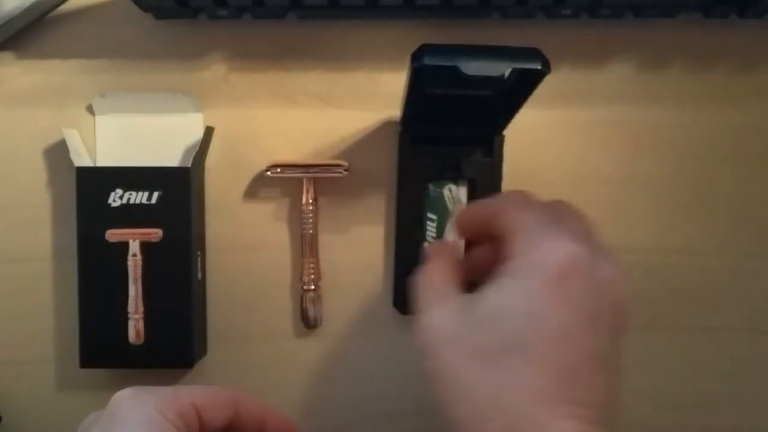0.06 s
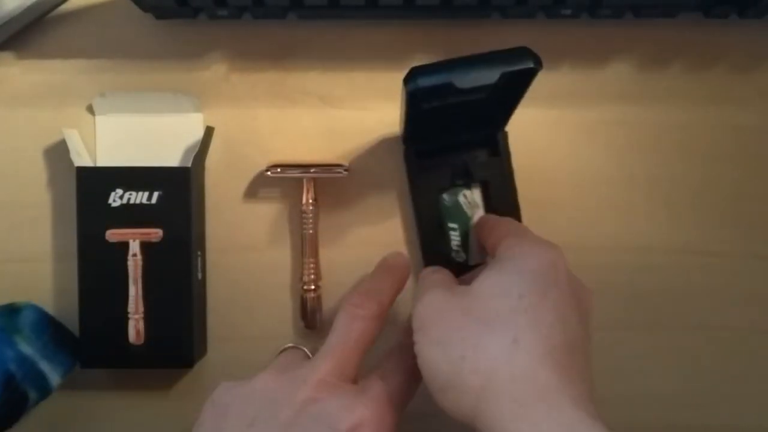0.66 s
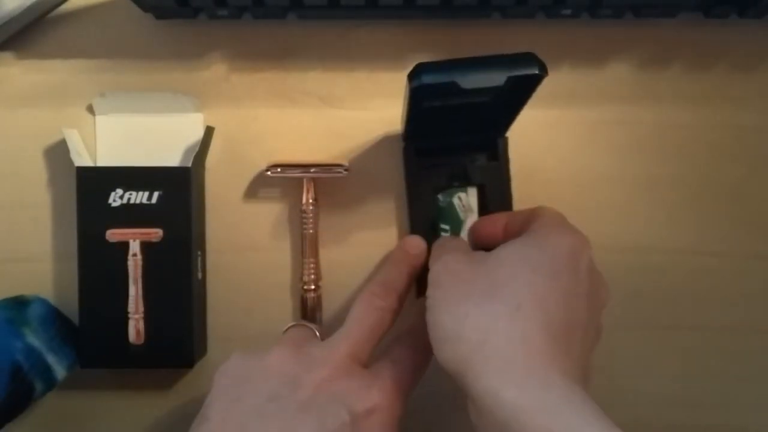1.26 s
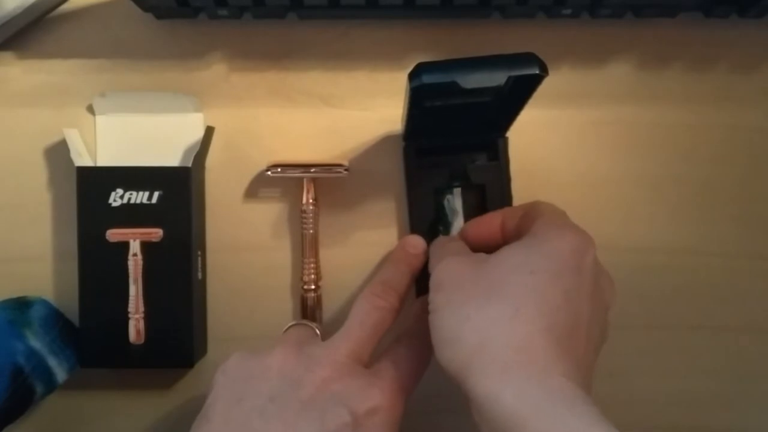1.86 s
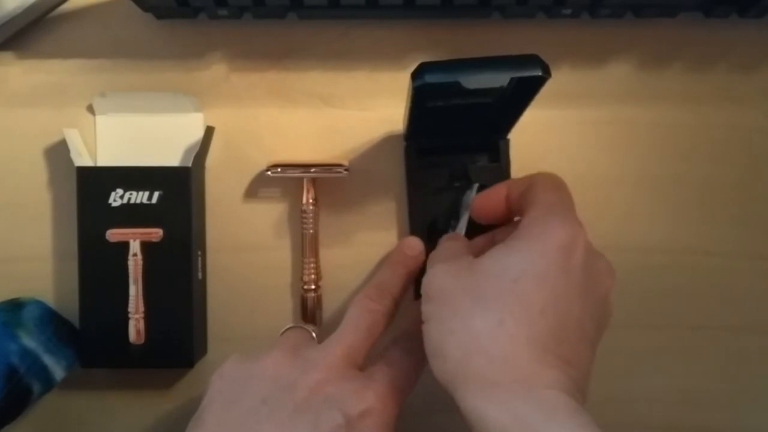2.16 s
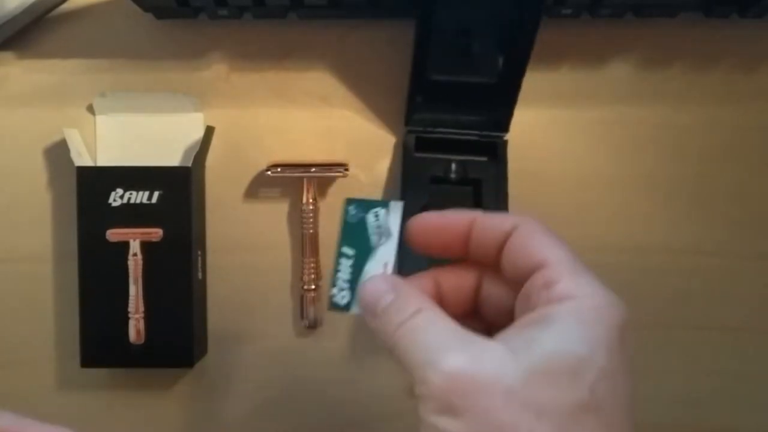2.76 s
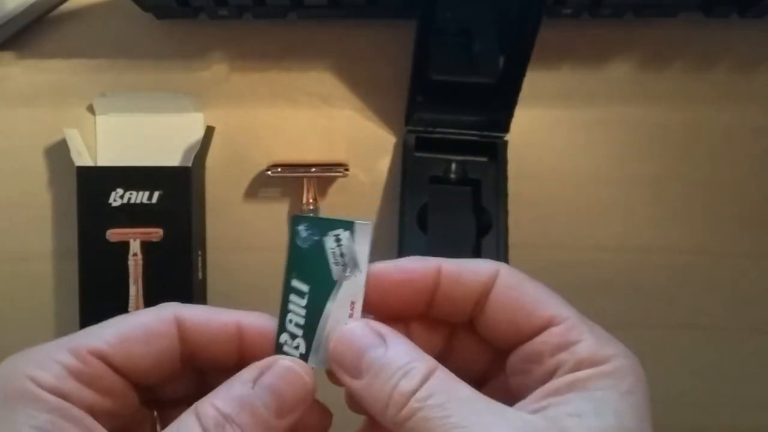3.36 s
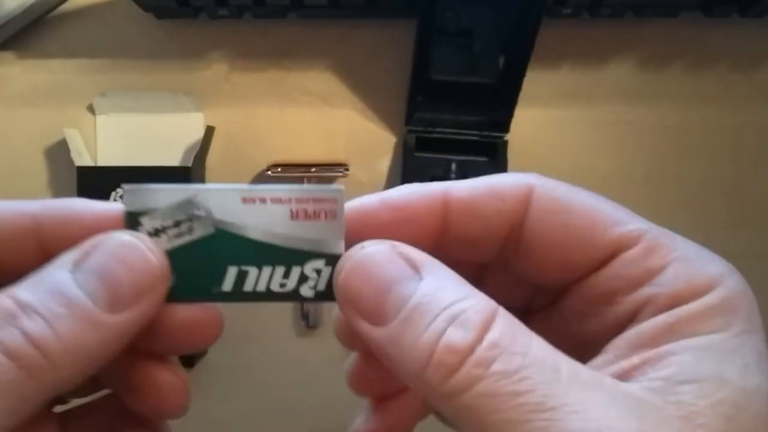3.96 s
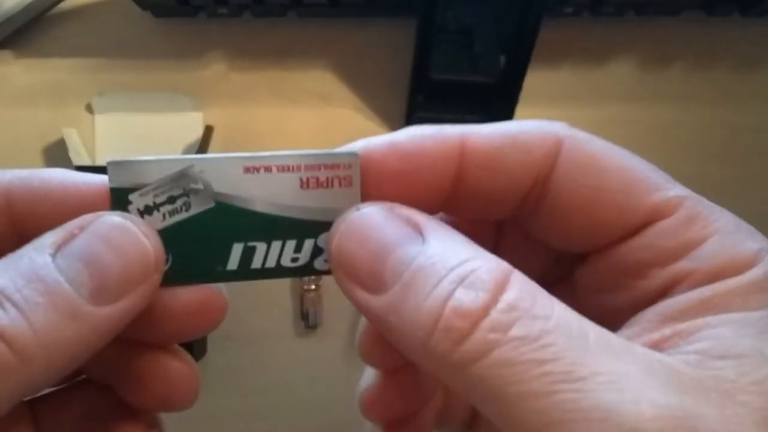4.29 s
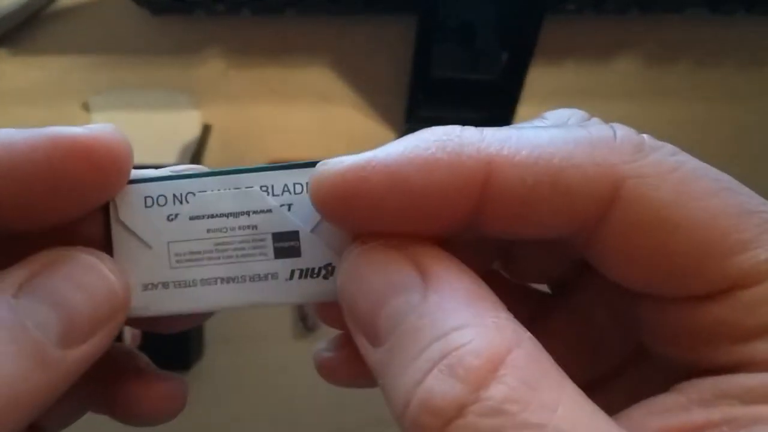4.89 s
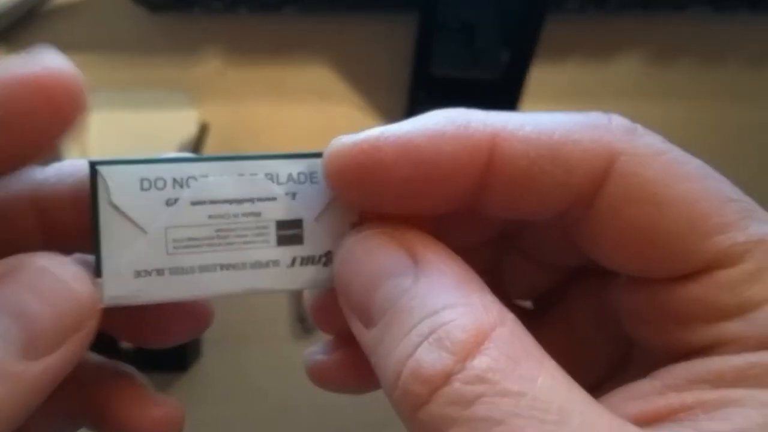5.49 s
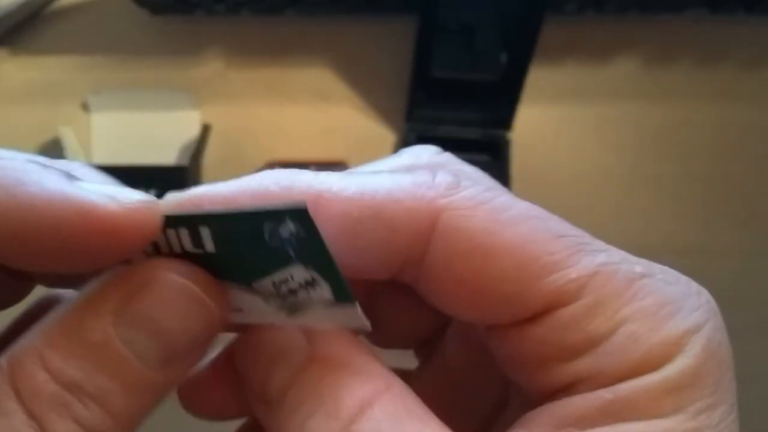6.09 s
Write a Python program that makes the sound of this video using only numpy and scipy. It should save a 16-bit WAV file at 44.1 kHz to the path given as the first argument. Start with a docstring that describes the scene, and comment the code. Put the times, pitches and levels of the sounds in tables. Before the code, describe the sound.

In a quiet room with a low hum, a hard plastic razor case scuffs briefly across a wooden desk. A paper pack of blades is pried from its tray with a sharp snap, small scrapes and a faint squeak while the case knocks lightly. The lid falls open with a loud, ringing clack and bounces. Then fingers turn the pack over, with soft rubbing and small crinkling ticks heard up close.

```python
"""A quiet room hums, fingers brush paper, and a hard plastic razor case slides, knocks and groans on
a wooden desk as it sticks and slips. A paper pack of razor blades is pried out of the case: it
scrapes, squeaks and snaps against its tray. The lid falls open with a ringing clack and bounces.
Then the pack is turned over between the fingers: soft rubbing and small crinkling ticks."""
import sys
import numpy as np
from scipy import signal
from scipy.fft import rfft, irfft
from scipy.io import wavfile

SR = 44100
rng = np.random.default_rng(int(sys.argv[2]) if len(sys.argv) > 2 else 0)


def generate_wav(signal):
    """Clip the signal to [-1, 1] and save it as 16-bit WAV at the path in sys.argv[1]."""
    frames = np.transpose(np.atleast_2d(signal))
    scaled = np.clip(frames, -1, 1) * 32767
    pcm = np.round(scaled).astype(np.int16)
    wavfile.write(sys.argv[1], SR, pcm)


N = 270774
TIME = np.arange(N) / SR

# Levels compare the rows of a table; the functions set how loud each sound ends up.
# tone colour of the room's rumble and hiss: f/Hz, level/dB
ROOM_COLOUR = [(12, -41.5), (26, -2), (45, 1.5), (68, -12), (100, -10.5), (180, -11), (380, -16),
               (650, -18), (2200, -20), (3200, -21), (4500, -24.5), (6300, -25.5), (7800, -19),
               (9800, -19.5), (12000, -26), (16000, -27)]
# the deep hum swells: t/s of the top, level/dB, build-up/s
HUM_SWELLS = [(0.21, -53, 0.12), (0.65, -56.5, 0.61), (4.95, -53.5, 0.81)]
# faint steady tones of the room: f/Hz, width/Hz, level/dB
ROOM_TONES = [(94.1, 12, -74), (227, 8.5, -83), (383, 13, -84), (2970, 50, -84)]
# how long the room echoes: f/Hz, time to fade by 60 dB/s
ROOM_FADE = [(200, 0.72), (1000, 0.31), (4000, 0.22), (14000, 0.097)]
# how alike left and right are: f/Hz, likeness (1 = the same)
LIKENESS = [(60, 1), (130, 0.34), (380, 0.43), (700, 0.15), (1400, 0.0077), (15000, 0.012)]

# a finger slides over the paper: t/s of firmest press, level/dB, build-up/s, extra for the edge/dB
RUBS = [(0.45, -62, 1, 0.5), (0.905, -62.5, 0.13, 5.5), (1.94, -58, 0.16, 3.5), (2.18, -64.5, 0.21, 5),
        (2.44, -62, 0.32, -2), (3.07, -62, 0.81, 0.5), (3.481, -49, 0.1, -18), (3.61, -55.5, 0.062, -3),
        (3.685, -56.5, 0.083, 1), (3.77, -52, 0.033, -12), (3.825, -56, 0.073, -5), (3.934, -56, 0.073, -6),
        (4.065, -58.5, 0.15, 0.5), (4.21, -62, 0.15, -14), (4.335, -53.5, 0.063, -10),
        (4.39, -49.5, 0.061, -13), (4.409, -44.5, 0.011, 0), (4.57, -55, 0.091, -13),
        (4.632, -55, 0.016, -14), (4.69, -43, 0.036, -6.5), (4.795, -43.5, 0.026, -9),
        (5.48, -56, 0.057, -7), (5.737, -50, 0.18, -26), (5.88, -40, 0.028, -16), (5.907, -45.5, 0.036, -5),
        (6.057, -50, 0.12, -12), (6.132, -54, 0.022, -21)]
# hiss of skin on paper: f/Hz, level/dB
PAPER_COLOUR = [(600, -47), (2000, -18.5), (4200, -19.5), (5600, -12), (6800, -7.5), (8500, -0.5),
                (10300, -6), (11800, -10), (16000, -13)]
# rasp of the paper's cut edge on skin: f/Hz, level/dB
EDGE_COLOUR = [(600, -27.5), (1500, -18.5), (2300, -6.5), (3300, -9), (4200, -1.5), (5600, -9.5),
               (8000, -0.5), (10500, -4), (14000, -8.5), (16000, -4.5)]
# the wrapper crinkles: t/s, level/dB, extra for the edge/dB
CRINKLES = [(3.6606, -45, -4), (3.831, -41, -6), (3.9852, -40.5, 6), (4.4098, -32, -3), (4.6784, -42, -3),
            (4.6922, -34, -11), (4.7015, -35.5, -2), (4.7832, -33.5, -7), (4.7935, -31.5, -11),
            (4.8023, -29.5, -9), (4.8113, -31, -7), (5.8795, -30, -9), (5.8946, -30, -6), (5.904, -25, -5)]
# tick of a paper fold: f/Hz, level/dB
CRINKLE_COLOUR = [(400, -24), (800, -7), (2000, -20.5), (4200, -20), (5900, -23), (7300, -0.5), (8400, 15),
                  (10300, 7.5), (11500, -32), (16000, -48)]

# the case is pushed over the desk: t/s of firmest push, level/dB, build-up/s
PUSHES = [(0.464, -51, 0.025), (0.51, -56, 0.078), (0.552, -51.5, 0.062), (0.6, -43.5, 0.05),
          (0.621, -42, 0.037), (0.806, -57.5, 0.04), (0.862, -58.5, 0.075), (0.911, -55.5, 0.051),
          (2.005, -64, 0.26)]
# rasp of plastic on wood: f/Hz, level/dB
DRAG_COLOUR = [(200, -28), (335, 2.5), (480, -14), (760, -1), (1000, -8.5), (1350, -1.5), (2300, -6),
               (2900, -14.5), (6000, -16.5), (9000, -12.5), (12000, -18), (15500, -36)]
# modes (natural notes; wider ones fade sooner) of the dragged case: f/Hz, width/Hz, level/dB
DRAG_MODES = [(334, 36, 4), (748, 50, 7), (1000, 120, -3), (1290, 70, -1), (1560, 45, -2), (1840, 35, -3),
              (2080, 89, -6), (2420, 55, -9)]
# the case rocks on the desk, and at 2.660 s the bouncing lid knocks it down: t/s, thud level/dB, rap level/dB,
# thud f/Hz
KNOCKS = [(0.457, -56, -39, 350), (1.700, -51, -53, 340), (1.732, -50, -58, 335), (1.753, -51, -52, 355),
          (2.062, -44, -42, 366), (2.140, -43, -41, 355), (2.547, -49, -54, 318), (2.660, -44, -46, 365),
          (5.903, -60, -55, 370)]
# notes of the desk top under the case: ratio to the thud's pitch, width/Hz, level/dB
DESK_MODES = [(0.89, 44, -1), (1.02, 55, 0), (1.09, 15, 5.5)]
# rap of the case on the desk: f/Hz, level/dB
RAP_COLOUR = [(250, -34.5), (500, -15), (800, -17), (1150, -0.5), (1500, -21), (2100, -8.5), (3200, -21),
              (6000, -19), (12000, -42)]
# notes of the case's hollow shell: f/Hz, width/Hz, level/dB
SHELL_MODES = [(619, 40, -3), (780, 50, -5), (1080, 70, -6), (1305, 60, 0), (1510, 150, 1), (2100, 70, -6),
               (2390, 60, -7)]

# the pack catches on the tray and snaps free: t/s, level/dB, scatter/s, top of the treble/Hz
SNAPS = [(0.457, -31.5, 0.004, 10000), (0.858, -41, 0.005, 9000), (0.912, -39.5, 0.004, 9000),
         (1.1335, -37.5, 0.0008, 8000), (1.2085, -28, 0.005, 18000), (1.2108, -14, 0.0011, 20000),
         (1.2137, -19, .004, 20000), (1.2166, -18.5, 0.005, 20000), (1.2215, -22, .019, 20000),
         (1.5262, -38, 0.003, 16000), (1.5690, -25, 0.004, 18000), (1.9604, -23.5, 0.0019, 7800)]
# flick of the pack's edge: f/Hz, level/dB
SNAP_COLOUR = [(300, -33), (900, -24), (2000, -18), (3100, -11), (3600, -16), (4400, -11.5), (5200, -5.5),
               (6100, -10), (7250, -2), (7900, -6), (8800, -3.5), (10400, -1), (11300, -4), (13000, -7),
               (16000, -6.5)]
# brief ping of the tray wall: f/Hz, width/Hz, level/dB
TRAY_MODES = [(5300, 420, 0), (7200, 400, -6)]
# the case groans at the hardest push: t/s of the top, level/dB, build-up/s, fade/s, f/Hz
GROANS = [(0.621, -46, 0.055, 0.014, 750), (0.624, -49.5, 0.035, 0.03, 332)]
# the pack scrapes along the tray: t/s of firmest press, level/dB, build-up/s
SCRAPES = [(1.175, -65, 0.11), (1.541, -53, 0.019), (1.560, -49.5, 0.026), (1.572, -41.5, 0.009),
           (2.015, -56.5, 0.1)]
# rasp of card on plastic: f/Hz, level/dB
SCRAPE_COLOUR = [(250, -15), (500, -6), (780, 0.5), (1100, -4), (1800, -7), (2400, 0.5), (3200, -10.5),
                 (4250, -2), (5500, -3.5), (8000, -1.5), (11000, -2.5), (16000, -12)]
# the squeezed pack squeaks: t/s of firmest press, level/dB, build-up/s
SQUEAKS = [(1.856, -45, 0.062), (4.70, -61, 0.063)]
# notes of the squeak: f/Hz, width/Hz, level/dB
SQUEAK_MODES = [(1450, 130, -6), (1720, 60, 4), (2130, 70, 4), (2750, 400, -11), (4170, 350, -8),
                (5100, 400, -12), (5850, 200, -9), (7620, 200, -1), (9800, 5000, -13)]

# the lid falls open and rattles: t/s, level/dB, scatter/s
CLACKS = [(2.6162, -28.5, 0.0073), (2.6193, -9, 0.0013), (2.6208, -8.5, 0.01), (2.6265, -15.5, 0.032),
          (2.6375, -28, .004), (2.6573, -22, 0.003), (2.6603, -20.5, .004), (2.6945, -24, 0.0089),
          (2.7212, -28.5, 0.0078)]
# crack of plastic on plastic: f/Hz, level/dB
CRACK_COLOUR = [(150, -32), (400, -13), (800, -13.5), (1250, -10), (1600, -8), (2050, -3), (2350, -9),
                (2700, -3), (3150, -11.5), (3700, -5.5), (4300, -6), (5000, -3), (6500, -4.5), (8200, 1),
                (10200, -0.5), (11800, -9.5), (16000, -15)]
# ringing of the plastic case: f/Hz, width/Hz, level/dB
CASE_MODES = [(1980, 200, -7), (2660, 170, -1), (3830, 160, 0), (4100, 70, -6), (4580, 150, -2),
              (4900, 120, -2), (5620, 70, -1), (5960, 43, -4), (6240, 51, -1), (6820, 90, -5),
              (7450, 70, 3), (7735, 34, 1), (7960, 45, 3), (8230, 40, 6), (8570, 30, 1), (8880, 39, 1),
              (9230, 30, 2), (9480, 36, 1), (9910, 25, 0), (10300, 45, -1)]
# the clack shakes the whole desk: f/Hz, width/Hz, level/dB
BOOM_MODES = [(48, 15, -10), (87, 7, -3), (259, 14, -1), (382, 15, -3)]


def from_db(db):
    """Turn decibels into a number to multiply by."""
    return 10 ** (np.asarray(db) / 20)


def rms_one(x):
    """Scale to an average power of 1."""
    return x / np.sqrt(np.mean(x ** 2) + 1e-20)


def energy_one(x):
    """Scale each channel so that its squares add up to 1."""
    return x / np.sqrt(np.sum(x ** 2, axis=-1, keepdims=True) + 1e-20)


def at_hz(points, hz):
    """Read between the rows of a table, with octaves evenly spaced."""
    knots, values = np.transpose(points)
    return np.interp(np.log(np.maximum(hz, 1)), np.log(knots), values)


def through(x, response):
    """Pass a sound through a thing, given that thing's response to one click."""
    return signal.fftconvolve(np.atleast_2d(x), np.atleast_2d(response), axes=-1)[:, :N]


def colour(spectrum, size=8192):
    """The tightest (minimum-phase) click that has the given tone colour."""
    gains = from_db(at_hz(spectrum, np.fft.rfftfreq(size, 1 / SR)))
    cepstrum = irfft(np.log(gains))
    return energy_one(irfft(np.exp(rfft(2 * cepstrum[:size // 2], size))))


def ringing(modes, size=16384):
    """A tapped body rings with one fading sine wave for each mode."""
    t, out = TIME[:size], 0
    for k, (hz, width, db) in enumerate(modes):
        fade = from_db(db) * width * np.exp(-np.pi * width * t)
        out = out + (-1) ** k * fade * np.sin(2 * np.pi * hz * t)
    return energy_one(out)


def filtered(x, kind, hz):
    """Keep the "low", "high" or "band" part of a sound."""
    return signal.sosfilt(signal.butter(2, hz, kind, fs=SR, output="sos"), x)


def shaded(x, shade_hz=12500):
    """The highest treble is weaker on the right."""
    return np.array([x[0], filtered(x[1], "low", shade_hz)])


def stereo_noise(size):
    """White noise whose left and right are alike in the bass and unrelated in the treble."""
    alike = np.clip(at_hz(LIKENESS, np.fft.rfftfreq(size, 1 / SR)), -1, 1)
    mid, side = rfft(rng.standard_normal((2, size)))
    return irfft(np.sqrt(1 + alike) * mid + np.sqrt(1 - alike) * side * [[1], [-1]], size)


def room_tail(size=20000):
    """A wash of room echoes that builds up quickly and dies sooner in the treble."""
    t, noise, out = TIME[:size], stereo_noise(size), 0
    edges_hz = np.geomspace(60, 19000, 9)
    for low, high in zip(edges_hz, edges_hz[1:]):
        fade_s = at_hz(ROOM_FADE, np.sqrt(low * high))
        out = out + filtered(noise, "band", [low, high]) * np.exp(-np.log(1000) * t / fade_s)
    return energy_one(out * (1 - np.exp(-t / 0.003)))


def desk_echoes(x, level_db, spread_s, count=24):
    """Add the quick treble echoes that come off the desk top and the things on it."""
    echoes = np.zeros((2, 2048))
    for side in echoes:
        lateness = rng.uniform(0, 1, count)
        at = np.clip(lateness * spread_s * SR + 20, 1, 2000).astype(int)
        side[at] = rng.choice([-1, 1], count) * np.exp(-lateness)
    response = from_db(level_db) * energy_one(filtered(echoes, "high", 3000))
    response[:, 0] += 1  # the direct sound
    return through(x, response)


def strokes(rows, bend, release_s, linger):
    """Loudness over time: each stroke builds up, then fades; `linger` makes slow ones fade later."""
    power = 0
    for s, db, build in rows:
        rise = np.clip(1 + (TIME - s) / build, 0, 1) ** bend
        fall = np.exp(-np.maximum(TIME - s, 0) / (release_s + linger * build))
        power = power + (from_db(db) * rise * fall) ** 2
    return np.sqrt(power)


def friction(pressure, per_s, spread_db, room_db, slip_s=0.00095):
    """Rubbing surfaces catch and slip at random; each slip is a tiny burst that echoes in the room."""
    sizes = from_db(spread_db * np.minimum(rng.exponential(1, N), 4))
    slips = sizes * (rng.random(N) < per_s / SR)
    burst_power = signal.lfilter([1], [1, -np.exp(-2 / (slip_s * SR))], slips ** 2 + 1e-18)
    direct = pressure * rms_one(np.sqrt(burst_power) * stereo_noise(N))
    return direct + from_db(room_db) * through(direct, room_tail())


def contacts(rows, scatter_db, room_db, size=20000):
    """Each contact is a sharp click, its quick scatter off things nearby, and the room's echo."""
    out, t, tail = np.zeros((2, N + size)), TIME[:size], room_tail(size)
    for s, db, scatter_s in rows:
        scatter = energy_one(stereo_noise(size) * np.exp(-t / scatter_s))
        blow = from_db(scatter_db) * scatter + from_db(room_db) * tail
        blow[:, 0] += 1  # the click
        at = round(s * SR)
        out[:, at:at + size] += from_db(db) * energy_one(blow)
    return out[:, :N]


def struck(rows, modes, vary_db, apart_hz, size=8192):
    """Every blow rings the modes with new strengths; high modes are less alike left and right."""
    out, t = np.zeros((2, N + size)), TIME[:size]
    hz, width, mode_db = np.transpose(modes)[:, :, None]
    for s, db, _ in rows:
        strength, start, apart = rng.standard_normal((3, len(modes), 1))
        fade = from_db(mode_db + vary_db * strength) * width * np.exp(-np.pi * width * t)
        phase = 2 * np.pi * (hz * t + start)
        shift = apart * hz / apart_hz
        ring = np.array([np.sum(fade * np.sin(phase + side * shift), axis=0) for side in (1, -1)])
        out[:, round(s * SR):][:, :size] += from_db(db) * energy_one(ring)
    return out[:, :N]


def quiet_room(hiss_db=-64.5, hum_db=-69, swell_db=-3, hum_hz=38, waver_hz=4):
    """Even rumble and hiss, a wavering deep hum that swells now and then, and a few faint tones."""
    hiss = from_db(hiss_db) * through(stereo_noise(N), colour(ROOM_COLOUR))
    knots = np.linspace(0, TIME[-1], 50)
    pitch = hum_hz + waver_hz * np.interp(TIME, knots, rng.standard_normal(len(knots)))
    swells = from_db(swell_db) * strokes(HUM_SWELLS, bend=2.1, release_s=0.032, linger=0.17)
    hum = np.hypot(from_db(hum_db), swells) * rms_one(np.sin(2 * np.pi * np.cumsum(pitch) / SR))
    air = stereo_noise(N)
    tones = sum(from_db(db) * through(air, ringing([(hz, width, 0)])) for hz, width, db in ROOM_TONES)
    return hiss + hum + tones


def paper_wrapper(rub_db=-2, edge_db=-1, tick_db=12.5, scatter_s=0.0008):
    """Skin hisses over the paper, whose edge crackles and whose folds give way in small ticks."""
    pressure = strokes([row[:3] for row in RUBS], bend=1.5, release_s=0.0052, linger=0.39)
    edge_rubs = [(s, db + edge, build) for s, db, build, edge in RUBS]
    edge_pressure = strokes(edge_rubs, bend=1.1, release_s=0.006, linger=0.35)
    skin_slips = friction(pressure, per_s=2200, spread_db=2.3, room_db=-13)
    edge_slips = friction(edge_pressure, per_s=330, spread_db=2.7, room_db=-11, slip_s=0.0003)
    hiss = from_db(rub_db) * through(skin_slips, colour(PAPER_COLOUR))
    crackle = from_db(edge_db) * through(edge_slips, colour(EDGE_COLOUR))
    folds = contacts([(s, db, scatter_s) for s, db, _ in CRINKLES], scatter_db=9, room_db=-5)
    edges = contacts([(s, db + edge, scatter_s) for s, db, edge in CRINKLES], scatter_db=9, room_db=-4)
    ticks = through(folds, colour(CRINKLE_COLOUR)) + through(edges, colour(EDGE_COLOUR))
    return (desk_echoes(hiss, level_db=0, spread_s=0.0086)
            + desk_echoes(crackle + from_db(tick_db) * ticks, level_db=-7, spread_s=0.008))


def case_drag(rasp_db=-2, ring_db=-3):
    """The case rasps and judders across the wood; its ring is the same left and right."""
    push = strokes(PUSHES, bend=1.2, release_s=0.015, linger=0.017)
    slips = friction(push, per_s=900, spread_db=1.9, room_db=-11)
    judder = friction(push, per_s=1200, spread_db=1.5, room_db=-17)[0]
    rasp = through(slips, colour(DRAG_COLOUR))
    ring = through(filtered(judder, "high", 270), ringing(DRAG_MODES))
    return from_db(rasp_db) * rasp + from_db(ring_db) * ring


def case_knocks(thud_db=23, rap_db=15, shell_db=16, rebound_s=0.0182):
    """The case taps the desk and rebounds: its shell raps, and the wood thuds at each spot's pitch."""
    rebounds = [(s + rebound_s, thud - 2, rap - 12, hz) for s, thud, rap, hz in KNOCKS]
    taps = list(KNOCKS) + rebounds
    thuds = np.zeros(N + SR)
    for s, db, _, hz in taps:
        ring = ringing([(ratio * hz, width, level) for ratio, width, level in DESK_MODES])
        thuds[round(s * SR):][:len(ring)] += from_db(thud_db + db) * ring
    thuds = thuds[:N] + from_db(-12) * through(thuds[:N], room_tail())
    clicks = contacts([(s, db, 0.007) for s, _, db, _ in taps], scatter_db=2, room_db=3.5)
    raps = from_db(rap_db) * through(clicks, colour(RAP_COLOUR))
    shell = from_db(shell_db) * through(clicks, ringing(SHELL_MODES))
    return thuds + raps + shell


def pack_snaps(snap_db=10.5, ping_db=4.5, clean_s=0.001):
    """The pack's edge flicks off the tray; the shorter the flick, the more the tray wall pings."""
    flicks, blows = 0, []
    for s, db, scatter_s, top_hz in SNAPS:
        click = contacts([(s, db, scatter_s)], scatter_db=13, room_db=5)
        flicks = flicks + filtered(click, "low", top_hz)
        blows.append((s, db - 10 * np.log10(1 + scatter_s / clean_s), scatter_s))
    pings = struck(blows, TRAY_MODES, vary_db=1, apart_hz=8000)
    snaps = desk_echoes(through(flicks, colour(SNAP_COLOUR)), level_db=-8, spread_s=0.012)
    return shaded(from_db(snap_db) * snaps + from_db(ping_db) * pings)


def case_groan(waver=0.01156, sag_per_s=0.3):
    """The case sticks and slips evenly enough to sing two low notes, which sag as it slows."""
    out, knots = 0, np.linspace(PUSHES[0][0], PUSHES[-2][0], 40)
    for s, db, build, release, hz in GROANS:
        wobble = waver * np.interp(TIME, knots, rng.standard_normal(len(knots)))
        pitch = hz * (1 - sag_per_s * (TIME - s) + wobble)
        level = strokes([(s, db, build)], bend=0.88, release_s=release, linger=0)
        out = out + level * rms_one(np.sin(2 * np.pi * np.cumsum(pitch) / SR))
    return out


def pack_scrapes(rasp_db=5, squeak_db=1):
    """The card pack rasps along the tray, and squeaks where it is squeezed."""
    slide = strokes(SCRAPES, bend=1, release_s=0.008, linger=0.15)
    squeeze = strokes(SQUEAKS, bend=2, release_s=0.0082, linger=0.036)
    slide_slips = friction(slide, per_s=2500, spread_db=1.5, room_db=-12)
    squeeze_slips = friction(squeeze, per_s=1600, spread_db=1.5, room_db=-14)
    rasp = from_db(rasp_db) * through(slide_slips, colour(SCRAPE_COLOUR))
    squeak = from_db(squeak_db) * through(squeeze_slips, ringing(SQUEAK_MODES))
    return shaded(desk_echoes(rasp + squeak, level_db=0.5, spread_s=0.0033))


def lid_clack(crack_db=16, ring_db=11, boom_db=-5.5):
    """The lid hits its stop and bounces: the plastic cracks, the case rings and the desk booms."""
    crack = through(contacts(CLACKS, scatter_db=13, room_db=8), colour(CRACK_COLOUR))
    ring = struck(CLACKS, CASE_MODES, vary_db=1.8, apart_hz=4000)
    ring = ring + from_db(-11) * through(ring, room_tail())
    boom = through(contacts(CLACKS, scatter_db=-1, room_db=0.5), ringing(BOOM_MODES))
    return shaded(from_db(crack_db) * crack + from_db(ring_db) * ring) + from_db(boom_db) * boom


def scene():
    """The quiet room and everything that happens on the desk."""
    return (quiet_room() + paper_wrapper() + case_drag() + case_knocks()
            + pack_snaps() + case_groan() + pack_scrapes() + lid_clack())


def record(dry):
    """Cut away the very highest treble."""
    cutoff_hz = 15900
    return signal.sosfilt(signal.ellip(10, 0.1, 80, cutoff_hz, fs=SR, output="sos"), dry)


dry = scene()
out = record(dry)
generate_wav(out)
```